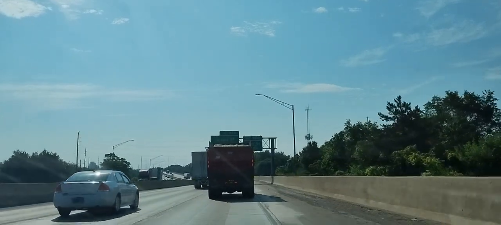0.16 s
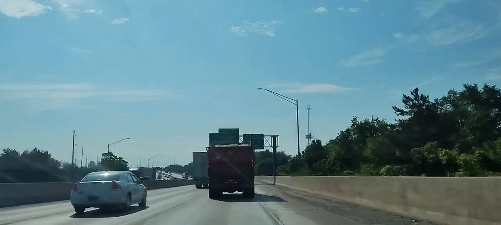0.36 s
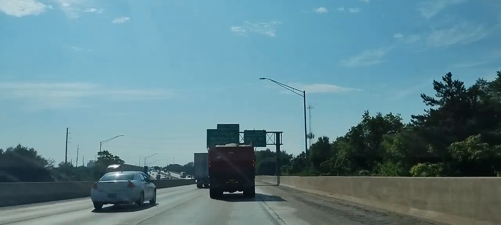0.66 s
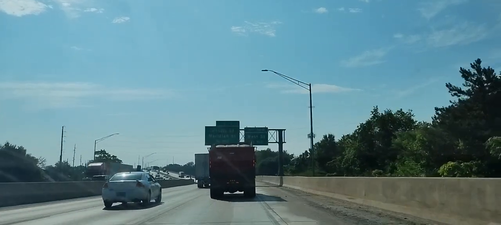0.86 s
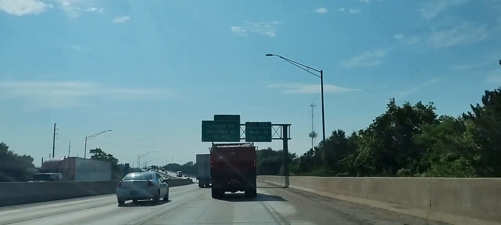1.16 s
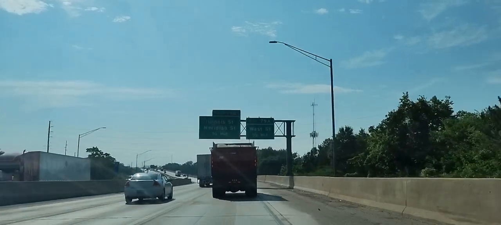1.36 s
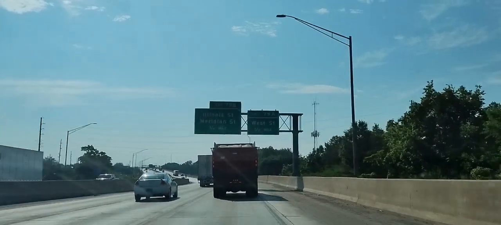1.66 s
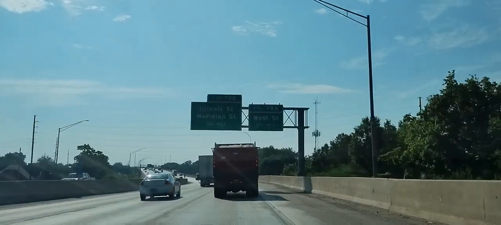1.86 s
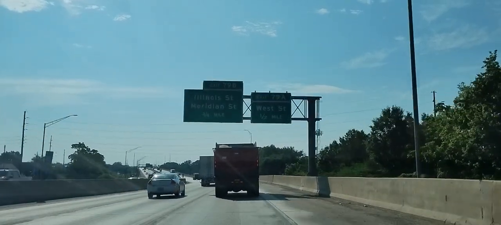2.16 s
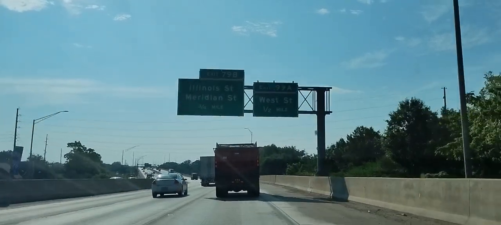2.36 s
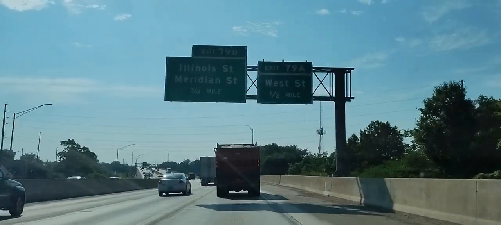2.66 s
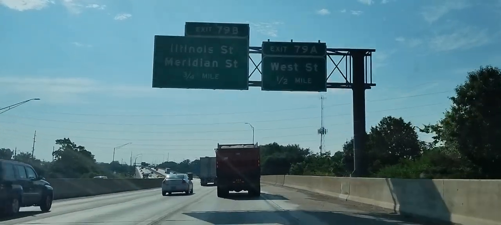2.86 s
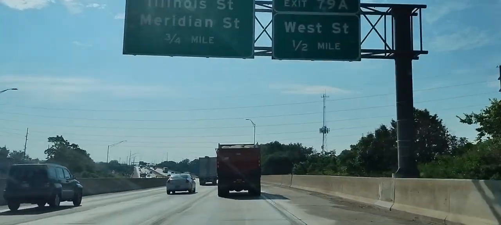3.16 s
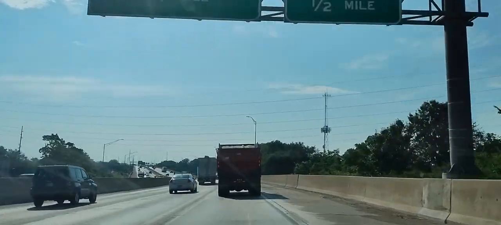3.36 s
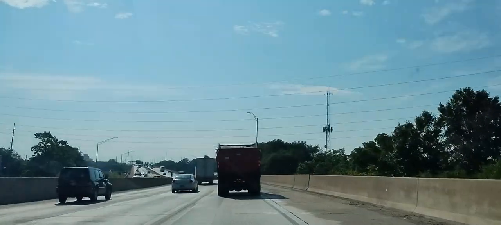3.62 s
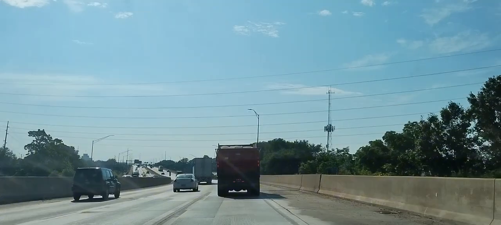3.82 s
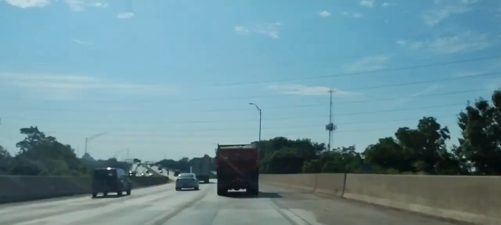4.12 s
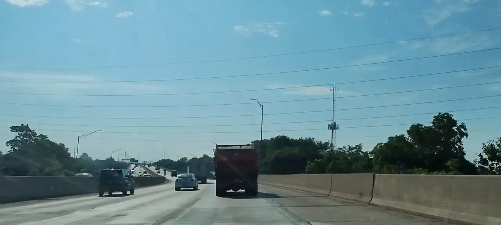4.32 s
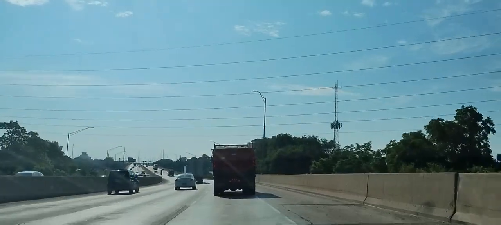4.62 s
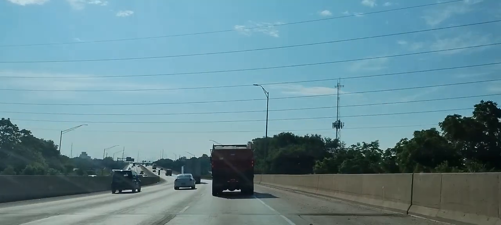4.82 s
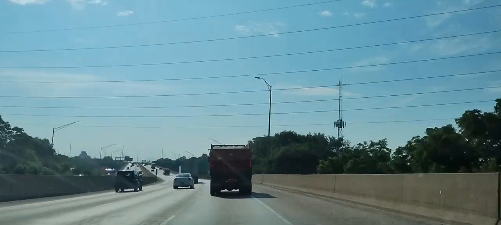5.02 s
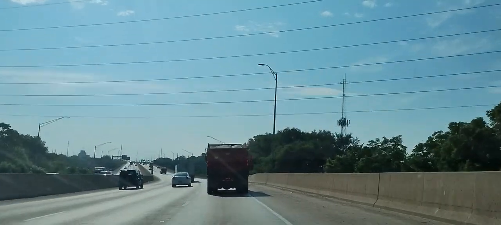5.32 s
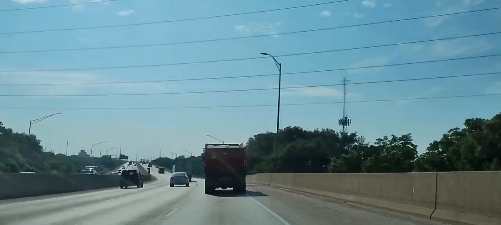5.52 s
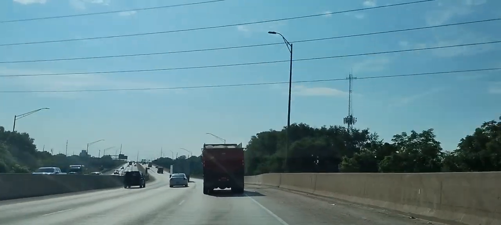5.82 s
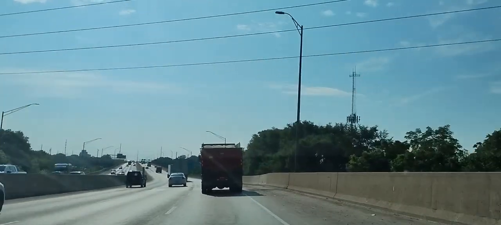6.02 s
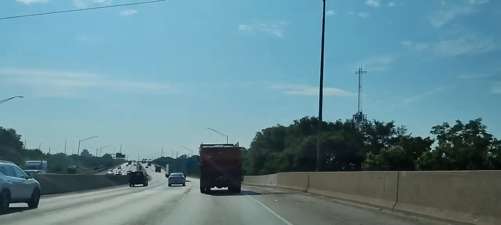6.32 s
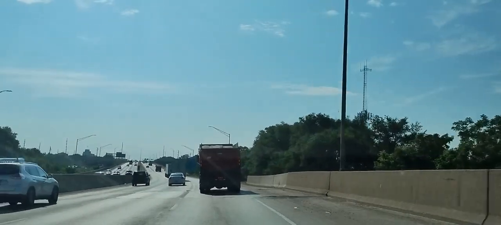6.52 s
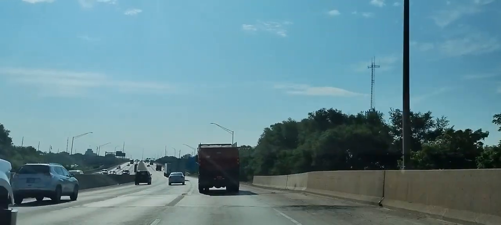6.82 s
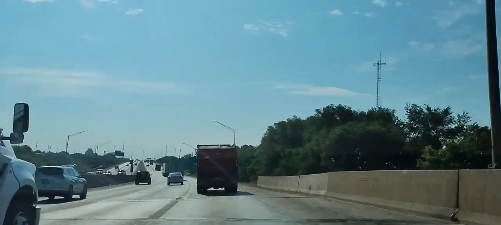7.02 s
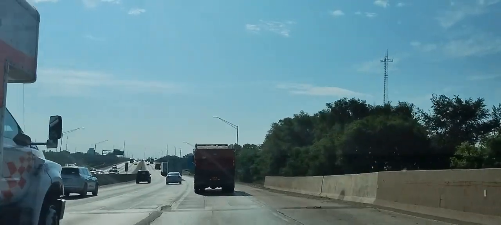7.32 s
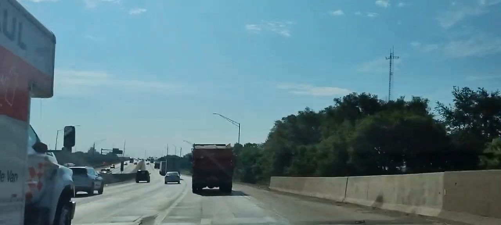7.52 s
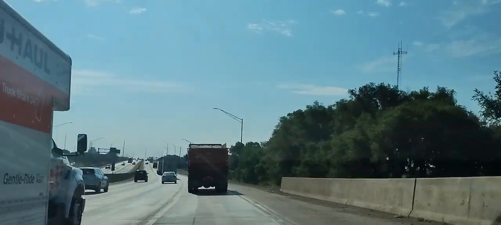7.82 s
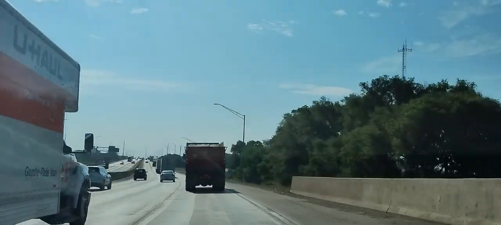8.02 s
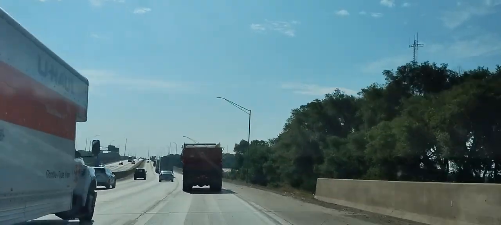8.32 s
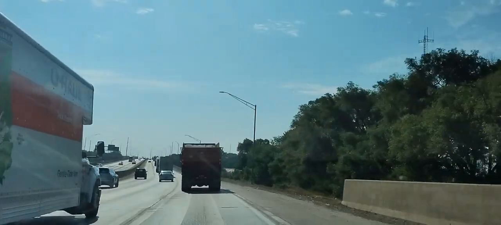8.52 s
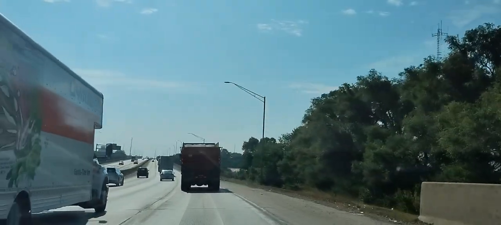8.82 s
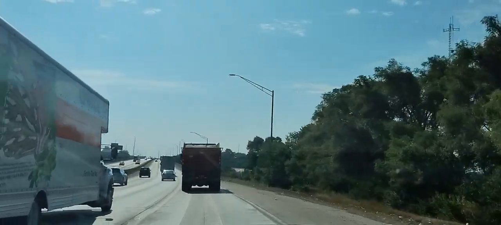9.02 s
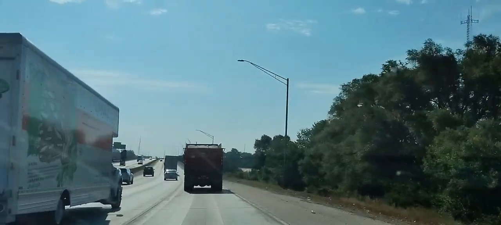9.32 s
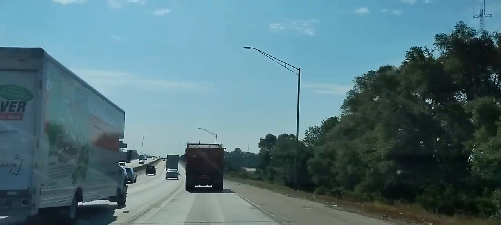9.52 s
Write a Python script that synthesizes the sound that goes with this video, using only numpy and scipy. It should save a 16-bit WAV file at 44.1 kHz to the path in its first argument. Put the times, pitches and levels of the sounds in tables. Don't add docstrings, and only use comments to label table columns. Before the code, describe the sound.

Inside a closed car at highway speed, deep floor boom and tyre roar swell over rough concrete, with thuds, rattling trim and a low engine hum.

```python
import sys
import numpy as np
from scipy import signal
from scipy.fft import rfft, irfft, next_fast_len
from scipy.io import wavfile
from scipy.ndimage import uniform_filter1d, map_coordinates

SR = 44100
rng = np.random.default_rng(int(sys.argv[2]) if len(sys.argv) > 2 else 0)


def amp(db):
    return 10 ** (np.asarray(db, float) / 20)


def write(x):
    x = np.atleast_2d(x).T
    wavfile.write(sys.argv[1], SR, np.round(np.clip(x, -1, 1) * 32767).astype(np.int16))


N = 426447

# (time [s], level over smooth concrete [dB])
COARSENESS = [(0, -1), (1.4, -1.5), (3, 0), (4.2, 1.5), (4.9, 3.5), (5.3, 8.5), (5.6, 10.5), (5.75, 11.5),
              (5.92, 9.5), (6.1, 7.5), (7, 6.5), (7.55, 4.5), (7.68, 8.5), (8.15, 8), (8.5, 5), (8.9, 1.5),
              (9.3, 0.5), (9.67, 0.5)]
# (frequency [Hz], left minus right [dB])
EAR_TILT = [(100, .3), (280, .3), (430, 5), (560, .5), (1000, -1), (1900, -1.5), (2800, 3.5), (3500, 2),
            (4400, -2.5), (5600, -3.5), (6800, -7), (8500, -10), (11000, -11.5), (14000, -10)]


def unit(x):
    return x / np.sqrt(np.mean(x ** 2) + 1e-20)


def along(points, hz):
    f, v = np.transpose(points)
    return np.interp(np.log(hz + 1), np.log(f + 1), v)


def curves(rows):
    s, *cols = np.transpose(rows)
    return [np.interp(np.arange(N) / SR, s, c) for c in cols]


def wobble(rate_hz):
    knots = rng.standard_normal(int(N * rate_hz / SR) + 4)
    return map_coordinates(knots, [np.arange(N) * rate_hz / SR])


def filtered(x, response):
    m = next_fast_len(N + SR // 2)
    return irfft(rfft(x, m) * response(np.fft.rfftfreq(m, 1 / SR)), m)[..., :N]


def resonances(modes):
    def response(f):
        return sum((-1) ** k * amp(db) * 1j * f * w / (c * c - f * f + 1j * f * w)
                   for k, (c, w, db) in enumerate(modes))
    return response


def colour(spectrum):
    return lambda hz: amp(along(spectrum, hz))


def rush(response, patchy_db):
    # (frequency [Hz], left-right likeness [-1..1])
    likeness = [(30, 0.987), (68, 1.16), (100, 0.85), (260, 0.93), (390, .5), (460, 0.35), (620, 0.24),
                (850, 0), (1250, -0.59), (1750, -0.11), (2150, 0.28), (2600, 0.03), (4000, 0)]
    z = signal.stft(rng.standard_normal((2, N + 512)), nperseg=512)[2]
    field = uniform_filter1d(rng.standard_normal(z.shape[1:]), size=5, axis=0)
    field = uniform_filter1d(field, size=12, axis=1)
    pair = signal.istft(z * amp(patchy_db * unit(field)), nperseg=512)[1][:, :N]

    def spread(hz):
        angle = np.arccos(np.clip(along(likeness, hz), -1, 1)) / 2
        return response(hz) * [np.cos(angle), np.sin(angle)]

    mid, side = filtered(pair, spread)
    return np.array([mid + side, mid - side]) / np.sqrt(np.mean(mid ** 2))


def tone(hz, db, drift_hz, flutter_db):
    phase = 2 * np.pi * np.cumsum(hz + drift_hz * wobble(6)) / SR
    return np.sqrt(2) * amp(db + flutter_db * wobble(4.1)) * np.sin(phase)


def rung(rows, rise_s, t60_s, spread):
    out, t = np.zeros((2, N + SR)), np.arange(SR // 8) / SR
    chance = rng.standard_normal((len(rows), 2, 2, 5, 1))
    for (s, db, hz), (detune, phase) in zip(rows, chance):
        partials = np.sin(2 * np.pi * hz * (1 + spread * detune[0]) * t + np.pi * phase)
        envelope = amp(db - 60 * t / t60_s) * (1 - np.exp(-t / rise_s))
        out[:, round(s * SR):][:, :len(t)] += envelope * unit(partials.sum(axis=1))
    return out[:, :N]


def road():
    # (frequency [Hz], density [dB per Hz])
    floor_spectrum = [(12, -62.5), (22, -46.5), (35, -31), (50, -14.5), (62, -2.5), (86, -1), (100, 1.5),
                      (120, -0.5), (135, -4), (150, -19), (175, -15.5), (220, -52), (370, -120)]
    # (frequency [Hz], density [dB per Hz])
    drum_spectrum = [(88, -22.5), (150, -2.5), (178, -0.5), (253, 0.5), (295, -4), (328, -4), (372, -10.5),
                     (449, -12.5), (533, -17.5), (560, -16.5), (730, -53), (1230, -120)]
    # (frequency [Hz], density [dB per Hz])
    roar_spectrum = [(280, -29), (480, -4.5), (537, -6), (676, -1), (812, -1.5), (943, -3), (1090, -3),
                     (1300, -11.5), (1690, -42.5), (2860, -120)]
    # (frequency [Hz], density [dB per Hz])
    hiss_spectrum = [(680, -58), (1000, -17), (1150, -1), (1460, 3.5), (1620, -1.5), (1850, 0.5),
                     (2100, -1.5), (2400, -1.5), (2700, -4.5), (3100, -12), (3500, -24.5), (4200, -33.5),
                     (6000, -71)]
    # (frequency [Hz], density [dB per Hz])
    shudder_spectrum = [(12, -45.5), (22, -19.5), (32, -12.5), (42, -7.5), (52, -3), (62, -9), (90, -120)]
    # (frequency [Hz], width [Hz], level [dB])
    cavity_modes = [(447.6, 18, -3), (252.3, 25.4, -0.5), (406.5, 12, -2), (327, 12.4, -2.5)]
    coarse_db, = curves(COARSENESS)
    heave_db = heaves()
    slap, thud = joints()
    bump = wobble(14)
    floor_db = -33.5 + 1.5 * coarse_db + heave_db + 0.89 * bump
    drum_db = -34 + 0.85 * coarse_db + 0.35 * heave_db
    roar_db = -45 + 0.88 * coarse_db + 0.079 * heave_db + 0.17 * bump
    hiss_db = -49.5 + 0.83 * coarse_db + 0.34 * bump
    rings_db = -40.5 + 0.05 * (drum_db + 34.0)
    shudder_db = -47 + 1.4 * coarse_db

    boom = (amp(floor_db) + thud) * rush(colour(floor_spectrum), patchy_db=-0.1)
    drum = amp(drum_db + 1.1 * bump) * rush(colour(drum_spectrum), patchy_db=0.8)
    roar = amp(roar_db) * rush(colour(roar_spectrum), patchy_db=1.5)
    hiss = amp(hiss_db) * rush(colour(hiss_spectrum), patchy_db=0.95)
    rings = amp(rings_db) * rush(resonances(cavity_modes), patchy_db=1.5)
    shudder = amp(shudder_db) * rush(colour(shudder_spectrum), patchy_db=2.0)
    return boom + drum + roar + hiss + rings + slap + shudder + bumps()


def heaves():
    # (time [s], floor swell [dB], half length [s])
    waves = [(0.01, 7, 0.056), (0.757, 8, 0.17), (1.01, 7.5, 0.066), (1.264, 12.5, 0.12), (1.556, 4, 0.087),
             (2.008, 7, 0.043), (2.172, 6.5, .07), (3.75, 3, 0.17), (4.208, 9.5, 0.13), (5.275, 1, 0.12),
             (5.624, 5.5, 0.073), (6.097, 4.5, 0.084), (6.402, 2, 0.14), (7.397, 5, 0.2), (7.624, 5, 0.088),
             (7.853, 2, 0.3), (8.239, 7.5, 0.11), (8.741, 4, 0.2), (9.133, 8.5, 0.15), (9.282, 8.5, 0.032),
             (9.393, 16, 0.03), (9.658, 5.5, 0.045)]
    t = np.arange(N) / SR
    return sum(db * np.exp(-((t - s) / half_s) ** 2) for s, db, half_s in waves)


def joints():
    # (time [s], peak [dB], low thud over peak [dB], slap pitch [Hz])
    slab_joints = [
        (0.612, -33, 22.5, 1000),
        (7.687, -29.5, -6, 1134),
        (7.952, -32.5, 8.5, 1055),
        (8.187, -30.5, 8.5, 932),
        (8.445, -34, 2, 1027),
        (9.2614, -29.5, 23, 1013),
    ]
    # (multiple of slap pitch, level [dB])
    carcass_modes = [(1, 3), (.7, -5), (.3, 3)]
    axle_hz, axle_t60_s, axle_db, rear_delay_s = 97, .3, -4, .135
    slap, thud, t = np.zeros(N), np.zeros(N), np.arange(N) / SR

    def ring(after, hz, t60_s, rise_s):
        envelope = amp(-60 * after / t60_s) * (1 - np.exp(-after / rise_s))
        return envelope * np.sin(2 * np.pi * hz * after)

    for s, db, thud_db, hz in slab_joints:
        front = np.clip(t - s, 0, 1)
        rear = np.clip(t - s - rear_delay_s, 0, 1)
        for multiple, mode_db in carcass_modes:
            slap += amp(db + mode_db) * ring(front, multiple * hz, t60_s=.07, rise_s=.002)
        knock = ring(front, axle_hz, axle_t60_s, 0.015) + ring(rear, axle_hz, axle_t60_s, 0.013)
        slap += amp(db + thud_db + axle_db) * knock
        thud += amp(db + thud_db - 17.0 - 60 * front / .5) * (1 - np.exp(-front / 0.0082))
    return slap, thud


def bumps():
    # (time [s], peak [dB], ring [Hz])
    hits = [(.600, -30, 259.4), (.608, -35, 754), (.905, -53, 990), (.968, -23, 265.5), (1.2, -47, 1000),
            (1.5, -57, 1070), (2.005, -43, 877), (2.095, -40, 875), (2.128, -37, 277), (2.36, -49, 973),
            (2.85, -27, 440), (2.87, -45, 1370), (2.945, -48, 904), (4.365, -40, 1085), (5.06, -44.5, 894),
            (5.245, -29.5, 347), (5.285, -41, 1303), (5.635, -26.5, 308), (5.755, -29, 896),
            (5.975, -35, 601), (6.95, -34, 1038), (7.15, -35.5, 1026), (7.25, -31, 198), (7.32, -25.5, 190),
            (7.35, -25.5, 233), (7.41, -27, 205), (7.45, -26, 248), (7.58, -25.5, 270.5),
            (7.67, -23.5, 256.6), (7.75, -29.5, 243.5), (7.82, -19, 136), (7.71, -37, 1116),
            (8.04, -24.5, 278.6), (8.16, -29, 311), (8.3, -24.5, 215.5), (8.405, -29.5, 997),
            (8.45, -33, 1122), (8.575, -30.5, 923), (9.015, -34, 838), (9.258, -39.5, 1130),
            (9.268, -37, 906), (9.4, -34, 805), (3.19, -23.5, 246), (3.85, -29, 262), (4.72, -30.5, 328),
            (4.9, -31, 327), (9.27, -30, 451), (9.45, -28.5, 459), (8.9, -35, 403), (4.4, -25, 125.5),
            (8.5, -28.5, 310), (5.98, -27.5, 300), (1.95, -29, 241)]
    return rung(hits, rise_s=0.0095, t60_s=0.23, spread=.075)


def tyre():
    coarse_db, = curves(COARSENESS)
    air_ring = resonances([(448, 22, 0)])
    lead_rad = .5 * np.array([[-1], [1]])
    hum = unit(filtered(rng.standard_normal(N), lambda hz: air_ring(hz) ** 2 * np.exp(1j * lead_rad)))
    return amp(-47 - .05 * coarse_db + 2.0 * wobble(3)) * hum


def drivetrain():
    # (time [s], turns [Hz])
    shaft_speed = [(0, 75.8), (2, 77.9), (5, 80.6), (7.5, 82.8), (9.67, 84.5)]
    # (time [s], rate [Hz])
    engine_rate = [(0, 22.6), (2.5, 23), (5, 23.97), (6.05, 24.05), (6.25, 20), (6.7, 19.2), (7.1, 18.93),
                   (7.5, 19.15), (9.67, 19.8)]
    # (time [s], level [dB])
    engine_load = [(0, -31.5), (.6, -39.5), (2, -41), (2.8, -41), (3.4, -29.5), (3.9, -24.5), (4.9, -22),
                   (5.4, -19.5), (6, -20), (6.15, -33), (6.35, -20.5), (7.52, -17.5), (7.66, -24.5),
                   (8, -31.5), (8.5, -23.5), (8.8, -25.5), (9.1, -40), (9.67, -25)]
    # (frequency [Hz], gain [dB])
    mount_gain = [(56, -16), (62, -1.5), (68, -1.5), (100, -0.7), (112, -14.5), (121, -11)]
    # (time [s], length [s], level [dB])
    grooves = [
        (1.8, .5, -62),
        (3.35, .35, -61),
        (4.68, .17, -46),
        (4.8, .4, -49),
        (5.4, .5, -52),
        (7.55, .35, -53),
        (8.46, .18, -46),
        (8.85, .2, -53),
        (9.03, .28, -49),
    ]
    shaft_hz, = curves(shaft_speed)
    coarse_db, = curves(COARSENESS)
    cycle_hz, = curves(engine_rate)
    load_db, = curves(engine_load)
    t = np.arange(N) / SR
    edge_s = .05
    singing = amp(-61)
    for s, length_s, db in grooves:
        singing = singing + amp(db) * np.clip(np.minimum(t - s, s + length_s - t) / edge_s, 0, 1)
    first = tone(shaft_hz, -37 + .8 * coarse_db, drift_hz=0.27, flutter_db=2.5)
    second_db = -39 - 0.92 * np.abs(shaft_hz - 76.4)
    second = tone(2 * shaft_hz, second_db, drift_hz=0.3, flutter_db=-2.0)
    third_hz, fifth_hz = 3 * cycle_hz, 5 * cycle_hz
    third = tone(third_hz, load_db + along(mount_gain, third_hz), drift_hz=0.5, flutter_db=2.0)
    fifth = tone(fifth_hz, load_db + along(mount_gain, fifth_hz), drift_hz=0.7, flutter_db=1.8)
    tread_order = 8.22
    whine = singing * tone(tread_order * shaft_hz, 0, drift_hz=2.6, flutter_db=1.5)
    return first + second + third + fifth + whine * amp([[1.5], [-1.5]])


def trim():
    snaps, shiver = ticks()
    return (buzz() + shiver) * amp([[-1.4], [1.4]]) + snaps + creaks()


def buzz():
    # (time [s], peak [dB], rise [s], fall [s])
    buzzes = [(2.634, -59.5, 0.023, 0.029), (5.625, -45.5, 0.043, 0.066), (5.72, -46.5, 0.026, 0.057),
              (5.78, -44, 0.056, 0.074), (5.968, -46, 0.036, 0.1), (7.668, -51, 0.022, 0.032),
              (7.716, -47.5, .015, 0.082), (7.866, -48.5, 0.068, 0.062), (7.95, -56, .02, 0.036),
              (8.02, -58.5, 0.026, 0.037), (8.125, -43, 0.029, 0.039), (8.24, -65, .03, .03),
              (8.324, -60, 0.038, 0.045), (8.4, -55, 0.014, .025), (8.475, -55.5, 0.018, .01),
              (8.56, -55.5, 0.059, .04), (8.65, -68, 0.018, .02)]
    # (frequency [Hz], width [Hz], level [dB])
    trim_modes = [(2950, 660, 8.5), (4230, 1150, 2), (5860, 600, -4.5), (7400, 810, -15),
                  (10100, 3100, -19)]
    contacts_per_s, top_hz = 2600, 5000
    slope_db = 17.5
    struck = rng.random((2, N)) < contacts_per_s / SR
    contacts = struck * amp(rng.exponential(size=(2, N))) * rng.standard_normal((2, N))
    rubbing = 0.098 * rng.standard_normal((2, N))

    def body(hz):
        tilt = amp([[.5], [-.5]] * along(EAR_TILT, hz))
        return resonances(trim_modes)(hz) / (1 + 1j * hz / top_hz) * tilt

    chatter = unit(filtered(contacts + rubbing, body))
    t = np.arange(N) / SR
    level = sum(amp(db + 3.5 - slope_db * np.maximum((s - t) / rise_s, (t - s) / fall_s))
                for s, db, rise_s, fall_s in buzzes)
    return level * chatter


def ticks():
    # (time [s], peak [dB], left minus right [dB], panel ring over peak [dB])
    closures = [(2.6200, -50, -2.5, -8), (2.628, -54, -4, -4), (5.565, -43, -8.5, -8.5),
                (5.576, -52.5, 4, -0.5), (5.612, -65, -2, 16), (5.945, -60, -6, 19),
                (5.7672, -57, -2, -2.5), (7.656, -49, -8.5, 1), (7.7094, -48, -6.5, -4),
                (7.7785, -48, -13, -4), (7.943, -48, -8, -2), (8.075, -56.5, -10.5, -6),
                (8.146, -44.5, -17, -7), (8.312, -54.5, -9, 2), (8.329, -55.5, -9.5, 1.5),
                (8.395, -43, -18, -3)]
    # (frequency [Hz], density [dB per Hz])
    snap_spectrum = [(2500, -34), (4500, 4), (6000, 2), (9000, -0.5), (14000, -7.5), (16000, -37.5)]
    # (frequency [Hz], gain [dB])
    left_shade = [(4000, 2.5), (7000, 0), (9000, -6.5), (14000, -7)]
    # (frequency [Hz], width [Hz], level [dB])
    panel_modes = [(3160, 800, 1), (4270, 590, -2)]
    snaps, shiver, t = np.zeros((2, N + SR)), np.zeros(N + SR), np.arange(SR // 8) / SR
    for s, db, pan_db, ring_db in closures:
        near = amp(db - 1.5 - 60 * t / 0.038 + np.array([[1.1], [-.3]]) * pan_db)
        reply = amp(db - 12.5 - 60 * t / .12 + np.array([[.4], [-.4]]) * pan_db)
        snaps[:, round(s * SR):][:, :len(t)] += near + reply
        ring = amp(db + ring_db - 2.0 - 60 * t / 0.062) * (1 - np.exp(-t / .008))
        shiver[round(s * SR):][:len(t)] += ring

    def shaded(hz):
        return colour(snap_spectrum)(hz) * amp([[1], [0]] * along(left_shade, hz))

    clicks = filtered(snaps[:, :N] * rng.standard_normal((2, N)), shaded)
    panel = unit(filtered(rng.standard_normal((2, N)), resonances(panel_modes)))
    return clicks, shiver[:N] * panel


def creaks():
    # (time [s], peak [dB], ring [Hz])
    clips = [(2.621, -39, 2550), (2.622, -42, 3200), (2.66, -67, 11000), (2.675, -68, 9000),
             (5.19, -68, 6000), (5.285, -68, 11700), (5.567, -58, 9500), (5.595, -67, 11900),
             (5.643, -61, 5500), (5.7, -56, 4300), (5.725, -50, 4400), (5.742, -47, 4520),
             (5.745, -64, 10000), (5.766, -61, 5860), (5.776, -48, 4330), (5.795, -50, 4400),
             (5.92, -61, 5800), (5.958, -51, 4000), (5.99, -45, 3860), (6.2, -59, 6500), (6.55, -63, 6400),
             (7.65, -61, 6930), (7.66, -44, 4500), (7.712, -60, 8600), (7.722, -54, 4300),
             (7.74, -63, 11500), (7.772, -60, 11000), (7.856, -60, 7200), (7.858, -63, 11700),
             (7.91, -60, 8800), (7.915, -48, 4300), (7.962, -58, 6550), (8.076, -70, 12700),
             (8.082, -66, 10200), (8.115, -47, 4000), (8.125, -49, 3160), (8.19, -51, 3900),
             (8.31, -56, 5830), (8.312, -56, 4000), (8.33, -55, 3620), (8.392, -57, 9500),
             (8.398, -46, 4330), (8.46, -62, 9000), (8.482, -66, 9650), (8.525, -58, 4450),
             (8.55, -53, 4300)]
    return rung(clips, rise_s=0.0037, t60_s=.09, spread=.06) * amp([[-7], [0]])


def wind():
    # (time [s], level [dB])
    wind_level = [(0, -74.5), (1.8, -76), (2.6, -72), (3.3, -70.5), (4.4, -69), (5, -66), (5.7, -61.5),
                  (6.2, -61), (6.8, -62.5), (7.4, -66), (8, -58), (8.7, -67), (9.1, -71), (9.67, -73.5)]
    # (frequency [Hz], density [dB per Hz])
    leak_spectrum = [(1500, -37.5), (2600, -9), (3400, -3.5), (4100, -6.5), (4800, -13), (5500, -12.5),
                     (6900, -17), (9000, -32.5), (14500, -41.5)]
    # (frequency [Hz], density [dB per Hz])
    fizz_spectrum = [(3000, -45), (4500, -0.5), (5600, -5), (6500, -12.5), (8000, -3.5), (11000, -5),
                     (12400, -8.5), (14200, -10), (15000, -41)]
    level_db, = curves(wind_level)
    gust = wobble(8.2)
    leak = amp(level_db + 3.0 + 0.45 * gust) * rush(colour(leak_spectrum), patchy_db=1.5)
    fizz_db = -78.5 + 0.53 * (level_db + 76.5) + 0.69 * gust
    return leak + amp(fizz_db) * rush(colour(fizz_spectrum), patchy_db=0.5)


def scene():
    side = np.array([[.5], [-.5]])
    cabin = road() + tyre() + drivetrain() + wind()
    return filtered(cabin, lambda hz: amp(side * along(EAR_TILT, hz))) + trim()


def starved(x):
    # (frequency [Hz], step over the band's level [dB])
    rough_steps = [(1500, -30), (2600, -15), (3400, -5), (4700, 1.5), (6000, 0), (8300, 0), (11000, 1.5),
                   (12500, 5), (14000, 9)]
    # (frequency [Hz], extra step [dB])
    left_extra = [(4500, 0), (6200, 3), (11500, 3), (13000, 1)]
    frame, grid = 1024, 392
    scatter_db = np.reshape([4.5, 3.6], (2, 1, 1))
    left_only = np.reshape([1, 0], (2, 1, 1))

    k = np.arange(2 * frame, dtype=np.float32)
    window = np.sin(np.pi * (k + .5) / (2 * frame))[:, None]
    angle = np.pi / frame * np.outer(k + .5 + frame / 2, k[:frame] + .5).astype(float)
    basis = window * np.cos(angle).astype(np.float32)
    lead = 2 * frame - grid
    padded = np.pad(x, ((0, 0), (lead, 2 * frame + (-N - lead) % frame)))
    halves = padded.reshape(2, -1, frame).astype(np.float32)
    lines = np.concatenate([halves[:, :-1], halves[:, 1:]], axis=2) @ basis
    bands = lines.reshape(*lines.shape[:2], -1, 16)

    power = uniform_filter1d(np.mean(bands ** 2, axis=3), size=3, axis=1)
    level = np.sqrt(np.abs(uniform_filter1d(power, size=3, axis=2))) + 1e-9
    luck = unit(uniform_filter1d(rng.standard_normal(level.shape), size=2, axis=1))
    luck = luck + .5 * rng.standard_normal((2, 1, level.shape[2]))
    hz = (np.arange(level.shape[2]) + .5) * SR / 2 / level.shape[2]
    step_db = along(rough_steps, hz) + left_only * along(left_extra, hz) + scatter_db * luck
    step = (level * amp(step_db))[..., None]
    rounded = np.sign(bands) * np.floor(np.abs(bands) / step + .4) * step

    frames = rounded.reshape(lines.shape).astype(np.float32) @ basis.T * (2 / frame)
    joined = frames[:, 1:, :frame] + frames[:, :-1, frame:]
    return joined.reshape(2, -1)[:, lead - frame:][:, :N].astype(float)


def roll_off(x):
    return signal.sosfilt(signal.butter(12, 14255, fs=SR, output="sos"), x)


def record(dry):
    held = dry / (1 + np.abs(dry / 1.0) ** 4) ** (1 / 4)
    mix = starved(held)
    return roll_off(mix)


dry = scene()
out = record(dry)
write(out)
```